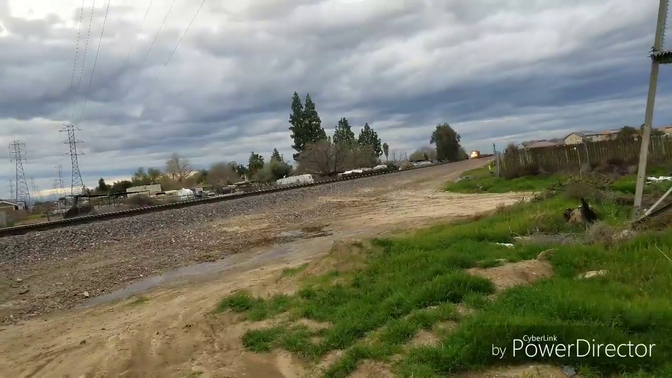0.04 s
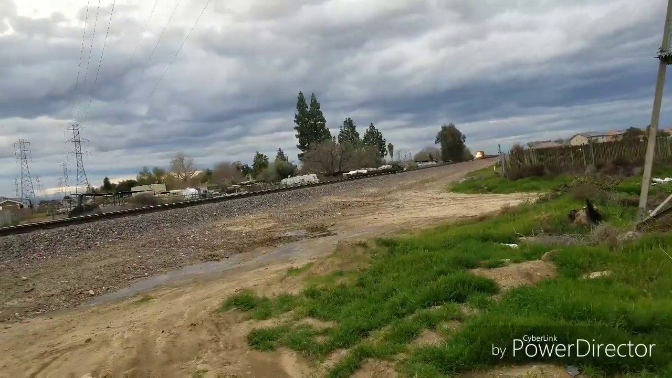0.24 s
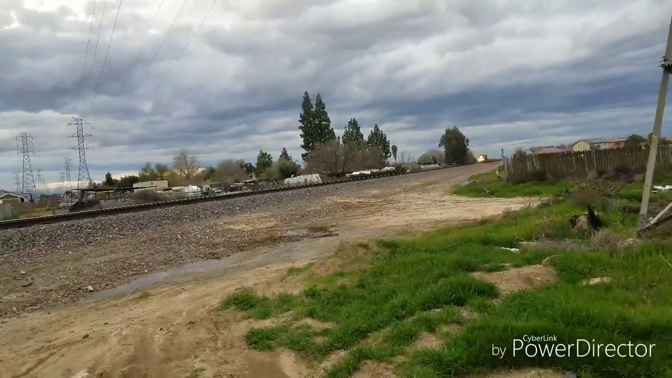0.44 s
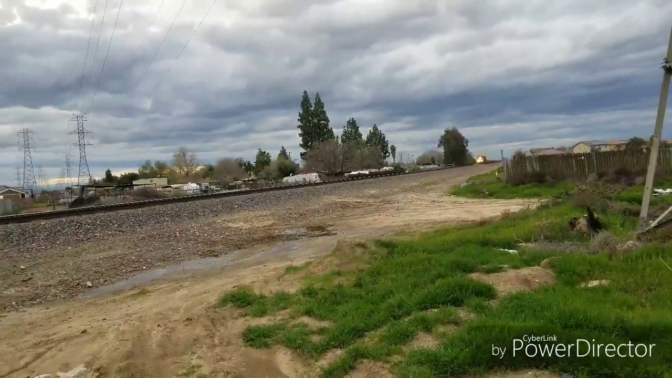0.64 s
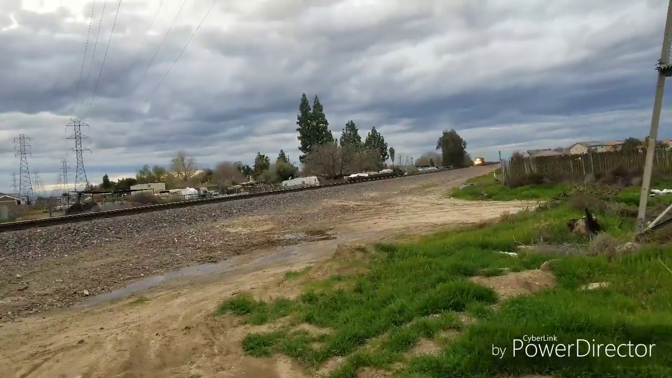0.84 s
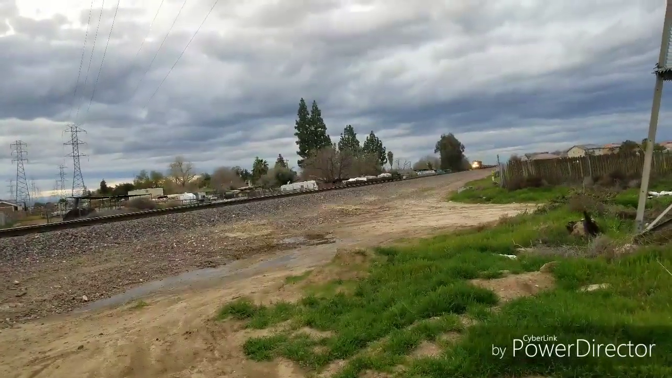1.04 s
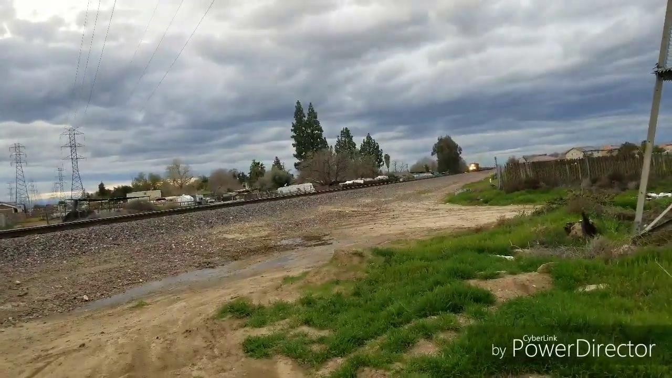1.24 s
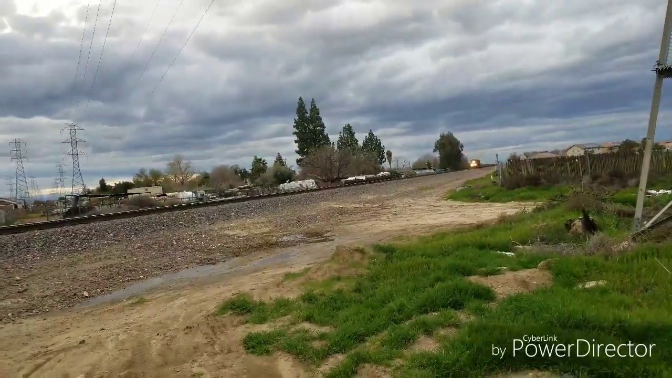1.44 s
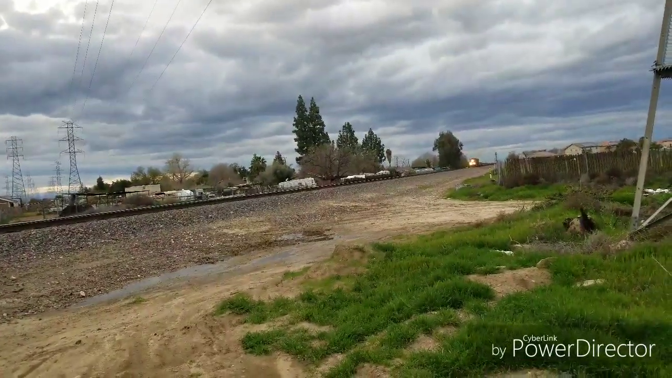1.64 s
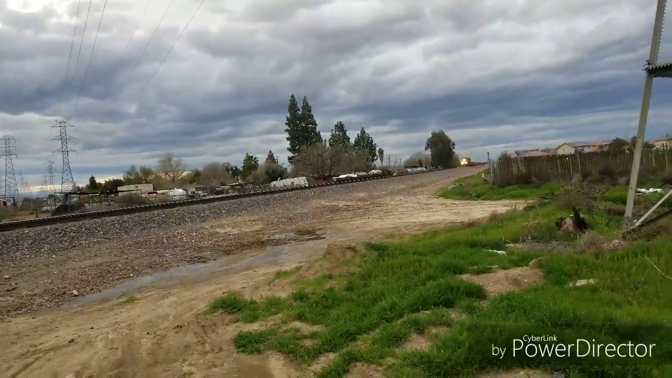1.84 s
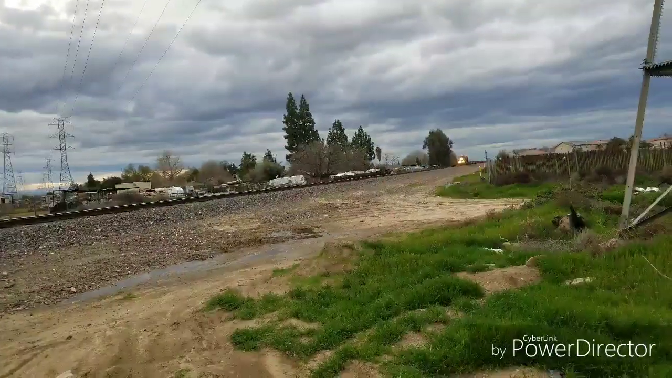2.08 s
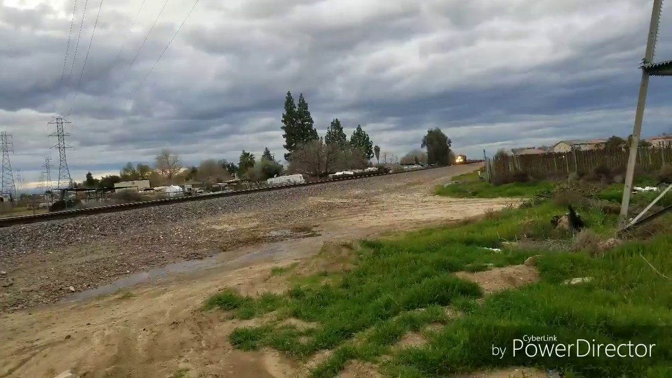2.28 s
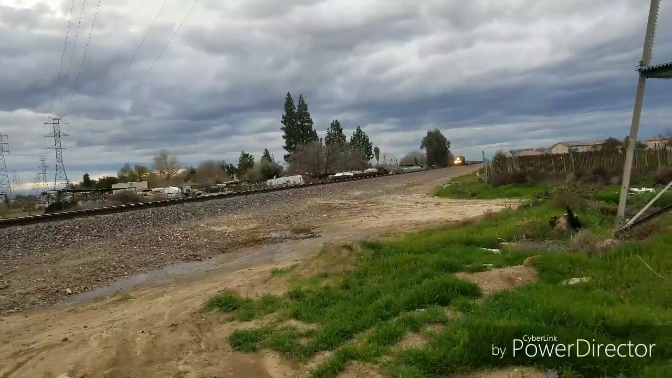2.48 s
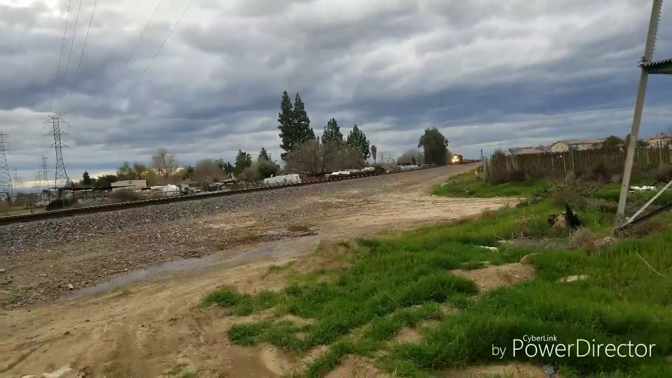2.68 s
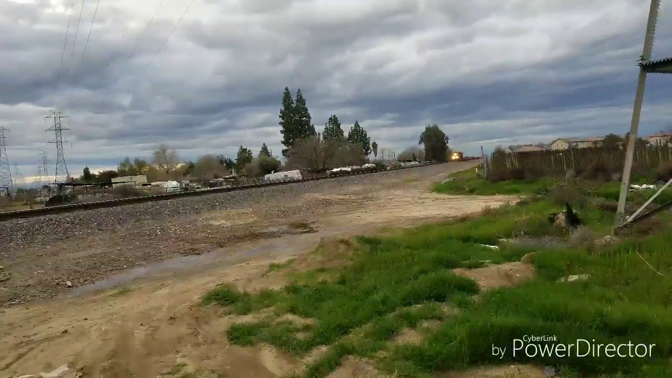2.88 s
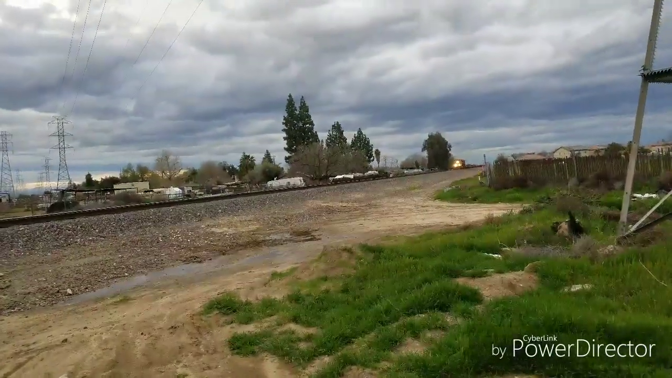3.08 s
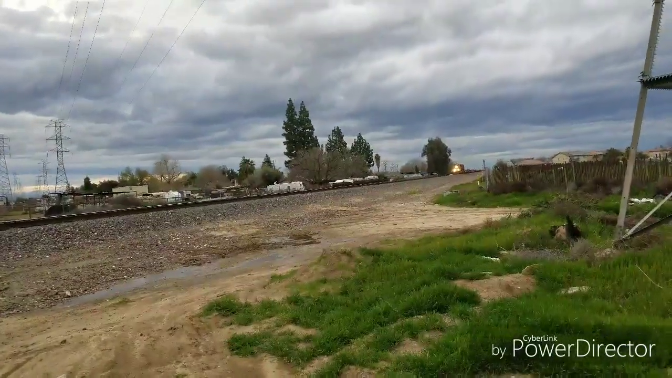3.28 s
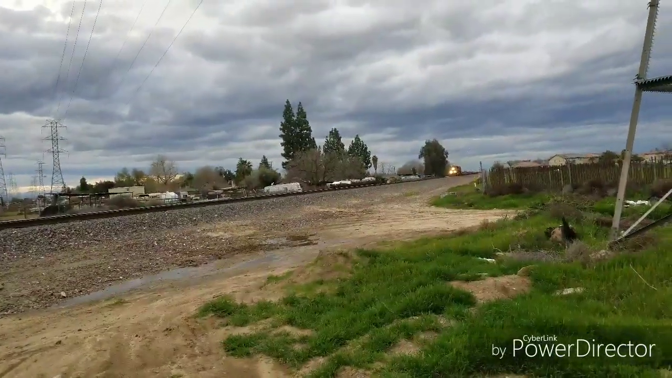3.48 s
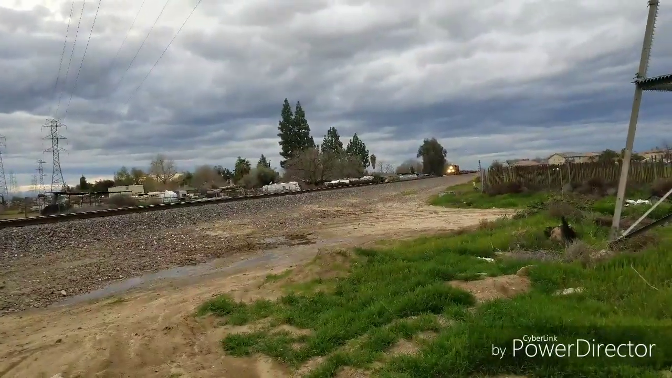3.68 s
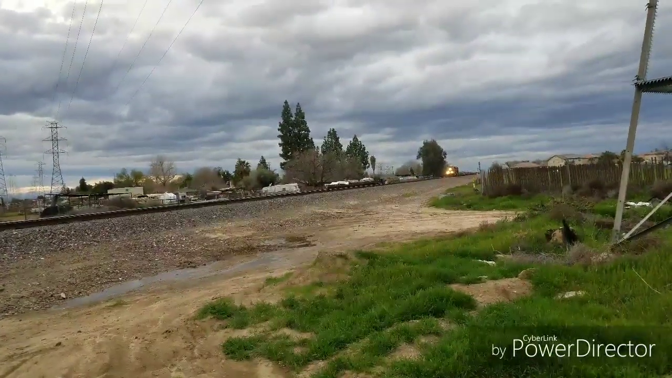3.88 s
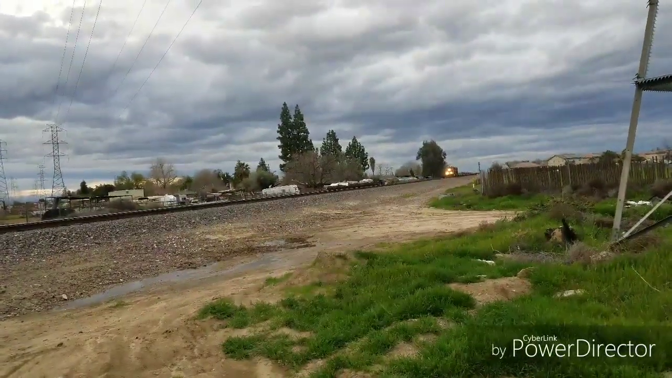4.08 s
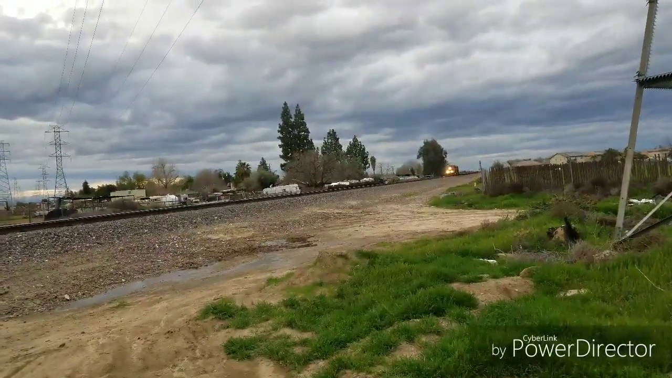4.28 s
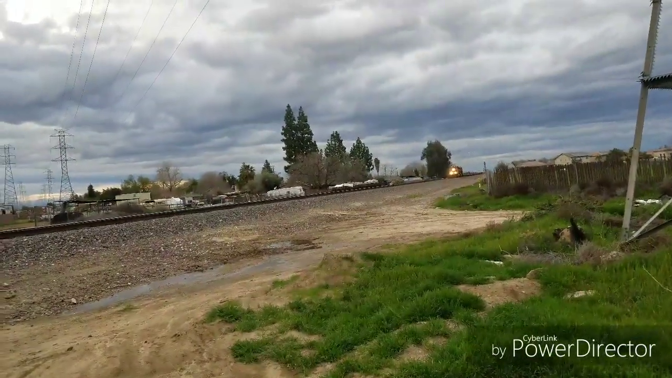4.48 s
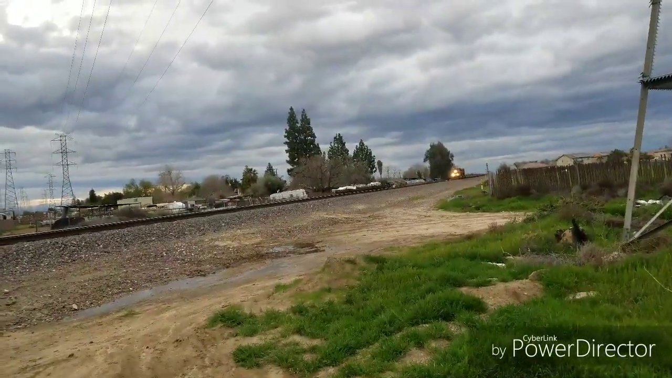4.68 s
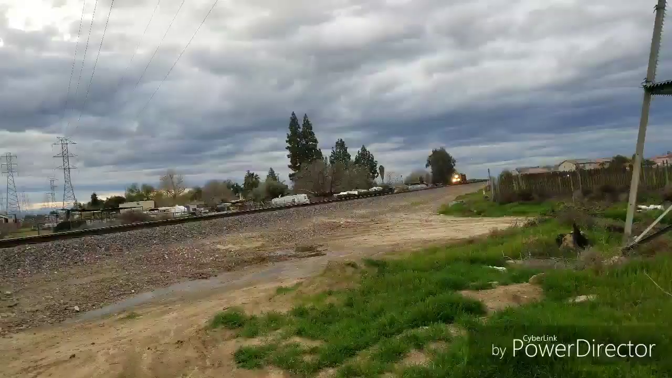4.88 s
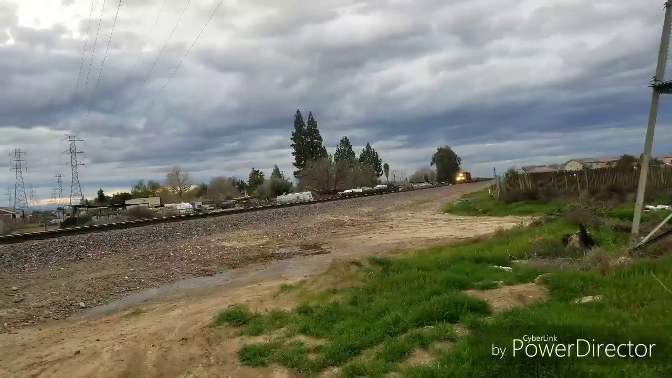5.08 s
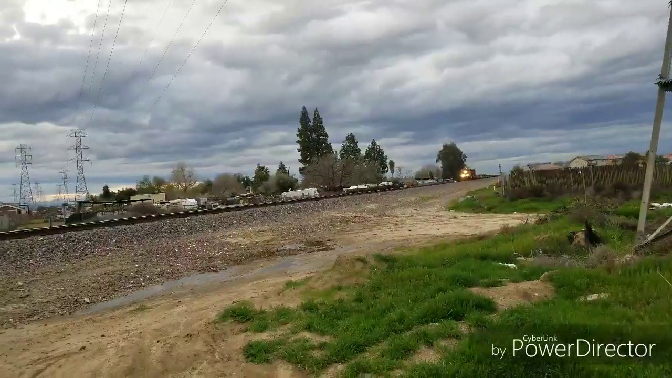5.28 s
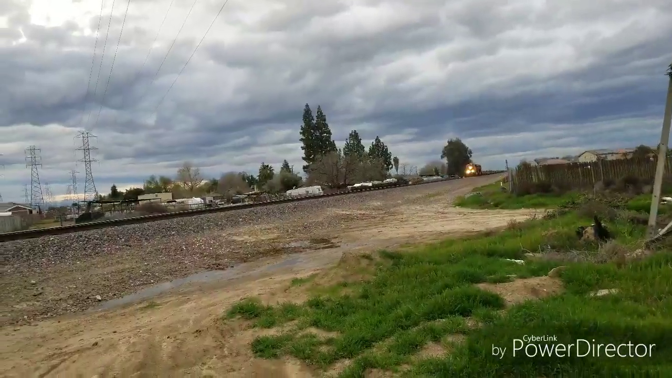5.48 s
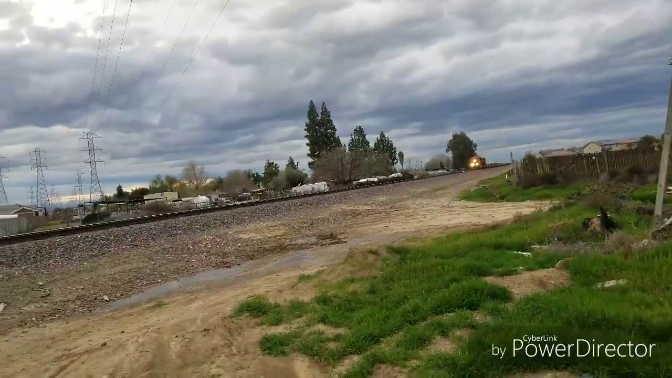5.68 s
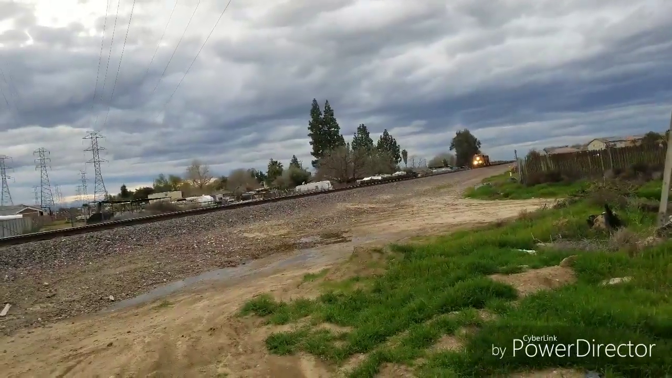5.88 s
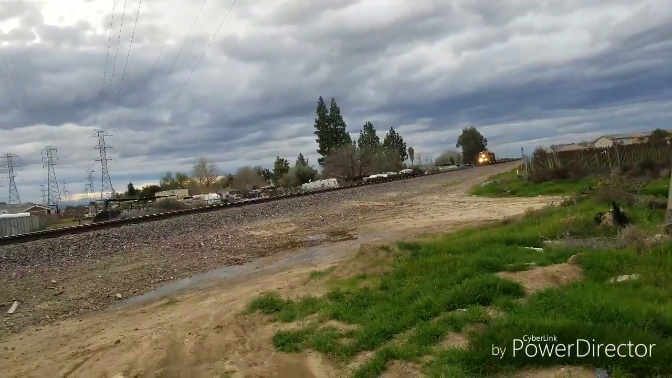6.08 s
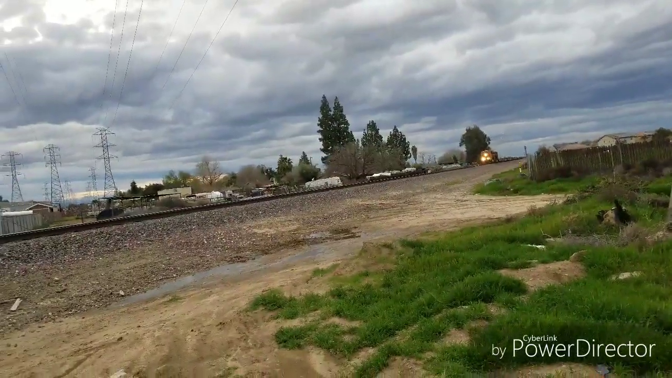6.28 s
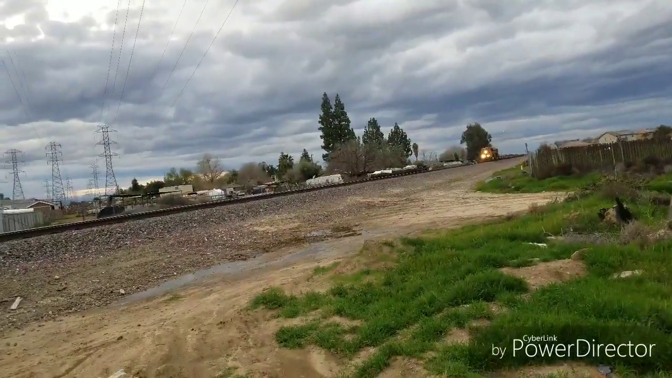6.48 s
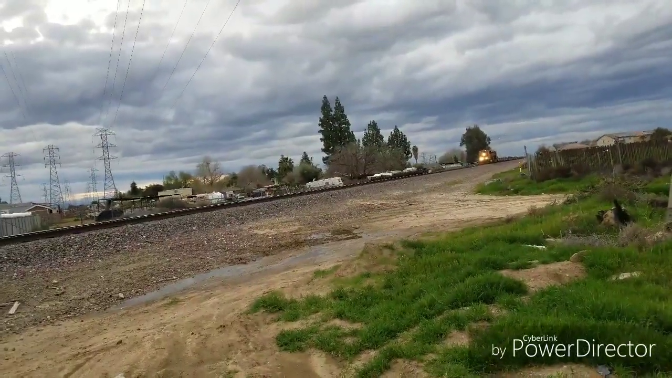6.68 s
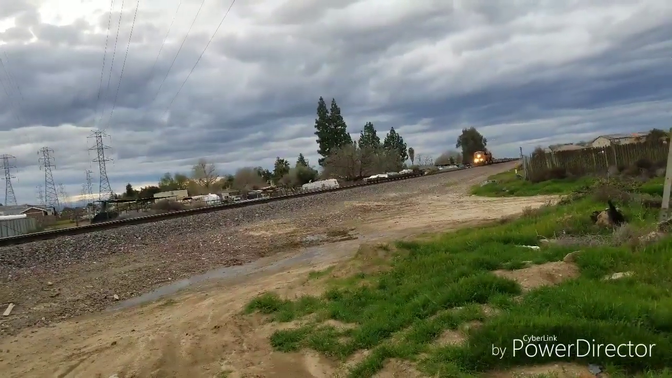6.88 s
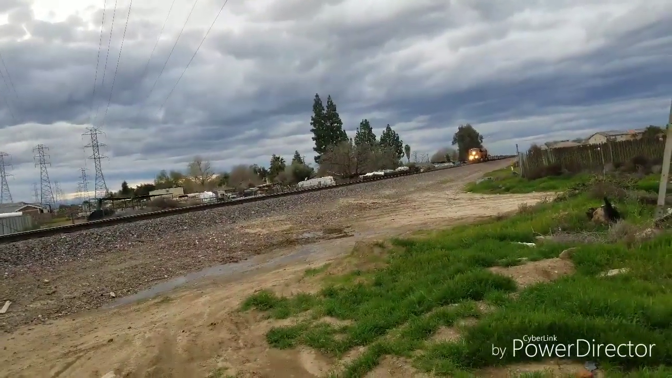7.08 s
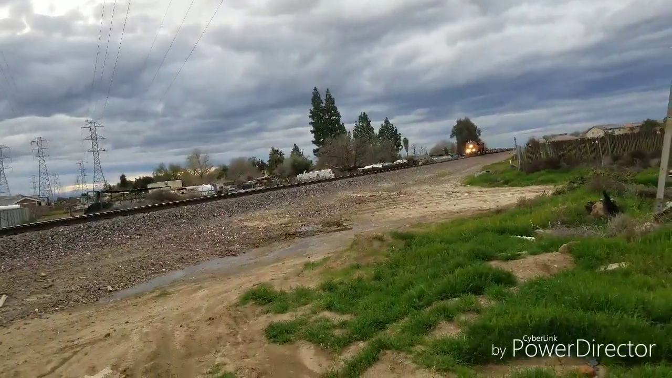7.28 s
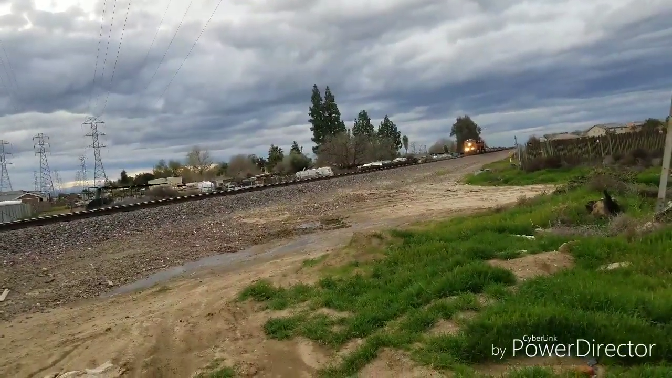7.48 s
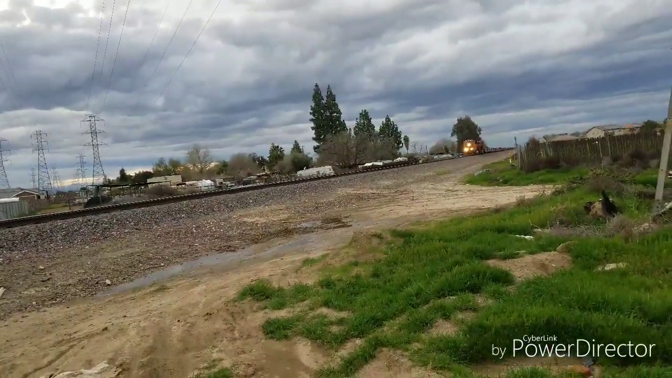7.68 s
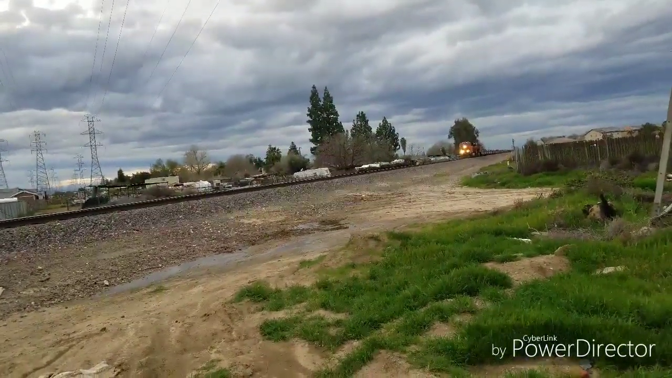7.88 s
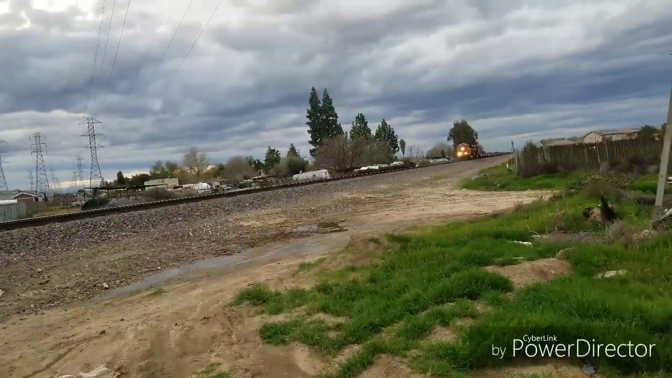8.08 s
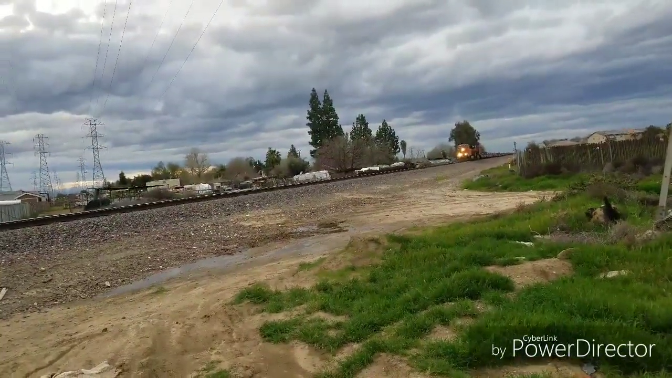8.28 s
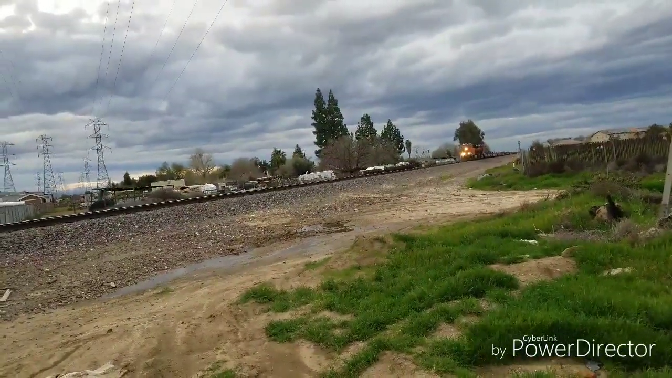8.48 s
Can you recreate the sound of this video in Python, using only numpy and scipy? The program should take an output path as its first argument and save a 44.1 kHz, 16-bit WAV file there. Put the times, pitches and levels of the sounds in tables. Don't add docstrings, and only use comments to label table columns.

```python
import sys
import numpy as np
from scipy import signal
from scipy.io import wavfile
from scipy.ndimage import uniform_filter1d

SR = 44100
rng = np.random.default_rng(int(sys.argv[2]) if len(sys.argv) > 2 else 0)


def master_out(mix):
    frames = np.transpose(np.atleast_2d(mix))
    ceiling = np.clip(frames, -1, 1)
    pcm = np.round(ceiling * 32767).astype(np.int16)
    wavfile.write(sys.argv[1], SR, pcm)


def elevation(decibels):
    levels = np.asarray(decibels, float)
    return 10 ** (levels / 20)


N = 376613
T = np.arange(N) / SR

# (time [s], nearness [0 far - 1 near])
APPROACH = [(0, -0.15), (1, -0.037), (2, 0.095), (3, 0.3), (4, 0.42), (5, 0.57), (6, 0.66), (7, 0.87),
            (7.6, 1.004), (8.54, 1.07)]
# (multiple of the engine cycle [1], far level [dB], near level [dB])
ENGINE_ORDERS = [(5, -60, -52), (6, -41.5, -41), (7, -51, -51), (8, -61, -55), (9, -36.5, -29.5),
                 (10, -47, -41), (11, -43, -36), (12, -41, -34), (13, -54, -46), (14, -54, -36),
                 (15, -43.5, -26), (16, -47, -34.5), (17, -49.5, -41), (18, -42, -35), (19, -48, -44),
                 (20, -52, -45), (21, -44, -37), (22, -47, -39), (23, -62, -50), (24, -54, -44),
                 (25, -46.5, -40), (26, -50, -42), (27, -51, -42.5), (28, -48.5, -39), (29, -56, -49),
                 (30, -52, -44), (31, -57, -51), (32, -65, -56), (33, -59, -50), (34, -67, -52),
                 (35, -67, -58), (37, -70, -56), (43, -80, -63)]
# (frequency [Hz], level [dB])
RUMBLE_SPECTRUM = [(20, -15.5), (40, -10.5), (62, 6.5), (75, 0.5), (100, 0.5), (200, 0), (300, -7),
                   (325, -14), (350, -10.5), (400, -20.5), (800, -41), (1500, -88.5)]
# (time [s], frequency [Hz])
BLADE_RATE = [(0, 536.5), (8.54, 541.8)]
# (multiple of the blade rate [1], far level [dB], near level [dB])
BLOWER_HARMONICS = [(2, -61, -58), (3, -67, -57.5), (4, -67, -65)]
# (frequency [Hz], level [dB])
HUM_SPECTRUM = [(250, -9.5), (420, -14.5), (528, -15), (575, -9.5), (880, -6.5), (1030, 0.5), (1130, -10),
                (1310, -16), (1550, -9), (1690, -13), (2200, -18.5), (2260, -19), (3200, -32.5),
                (4160, -25.5), (7040, -120)]
# (time [s], level [dB])
HUM_LEVEL = [(0, -52), (.6, -50.5), (3.5, -51.5), (3.9, -50), (4.3, -50.5), (7.6, -51.5), (8.0, -51.5),
             (8.54, -52)]
# (frequency [Hz], level [dB])
ROAR_SPECTRUM = [(380, -25.5), (520, 0), (650, 2), (800, 6), (920, -8.5), (1100, -28)]
# (frequency [Hz], level [dB])
GRASS_SPECTRUM = [(8800, -42), (9800, -5), (10500, -3), (14000, 1), (15500, -5)]
# (frequency [Hz], level [dB])
HISS_SPECTRUM = [(1530, -23.5), (2600, -2.5), (3250, -7), (4150, -2), (4720, -2), (5160, -2), (5800, -1.5),
                 (6600, -20), (8580, -46), (14500, -120)]
# (time [s], level [dB])
HISS_LEVEL = [(0, -63), (.2, -67.5), (.5, -60.5), (.85, -63), (2.2, -62.5), (4.5, -62.5), (6.6, -57),
              (7.1, -53.5), (8.54, -53)]
# (frequency [Hz], level [dB])
PUFF_TREBLE = [(5500, -24.5), (6400, 1), (7400, -10.5), (8600, -12.5), (9400, 0.5), (10500, -5.5),
               (12000, -23)]
RAIL_HZ = (8800, 9600, 10200, 10900, 11600, 12200, 12850, 13500, 14000, 14400, 14800, 15400)
RAIL_SHAPE = (-27.5, -13.5, -8, -5.5, -1.5, -3, 4, 0, 1, 0, 1, -6)
RAIL_MODES = (10950, 12054, 12138, 12678, 12754, 12803, 12935, 14057, 14404, 14478, 14754, 14905)
# (start [s], hold [s], level at the start [dB], level at the end [dB])
RAIL_BURSTS = [(0.02, .07, -64, -63), (.44, 0.035, -67, -72), (.6, 0.12, -66, -65),
               (0.966, 0.4, -63.5, -59), (1.426, 0.37, -59, -58), (2.09, 0.66, -61.5, -57.5),
               (2.9, .06, -63, -57.5), (3.478, 0.28, -56, -61), (3.734, 0.5, -56, -56),
               (4.508, 0.23, -72, -66), (4.788, 0.072, -60, -63), (5.35, 0.27, -61, -66),
               (5.64, 0.36, -55.5, -52.5), (6.17, .07, -62, -63), (6.405, 0.17, -54.5, -60),
               (6.832, 0.24, -52.5, -53), (7.107, 0.21, -52, -49.5), (7.494, 0.026, -51, -58),
               (7.62, 0.11, -54, -55.5), (8.088, 0.11, -53.5, -54), (8.313, .25, -53.5, -48.5)]
# (time [s], peak level [dB], ring frequency [Hz], relative snap level [dB], left-right [dB])
TICKS = [(0.4892, -51, 3000, 0, -4), (0.5982, -43, 5000, 7, -8), (0.605, -43, 5500, -1, 0.),
         (0.6395, -50, 5000, 5, -6), (0.7268, -46, 5200, 6, 0.), (0.7278, -44, 5330, 0., 6),
         (2.037, -50, 5070, 6, 3), (2.0542, -50, 5500, -3, -6), (3.273, -50, 4400, 4, 1),
         (3.5805, -52, 3100, 2, -3), (3.709, -50, 5430, -1, 4), (3.558, -52, 5000, 2, 0.),
         (4.655, -59, 2970, 13, -5), (4.7194, -57, 3880, 6, -1), (4.849, -52, 5500, 4, -3),
         (4.8953, -43, 4900, -10, -2.5), (5.3636, -46, 4940, -5, -1.5), (5.3894, -51, 5770, 1, 6),
         (5.651, -45, 5090, 3, 1), (6.2446, -47, 5180, -1, -3), (6.9494, -50, 5680, 7, -2),
         (7.655, -50.5, 5200, 6, -1), (8.358, -55, 5200, 5, -2)]
# (time [s], peak level [dB], ring frequency [Hz], relative snap level [dB], left-right [dB])
POPS = [(0.572, -43, 4380, -15, -2), (.6062, -40, 5000, -25, 0.), (.651, -47, 5300, -20, -1),
        (0.79, -51, 5560, -20, -2), (1.114, -48, 5600, -15, -1), (1.245, -46, 4000, -15, -6),
        (2.6979, -38.5, 4240, -28, -14), (4.909, -42, 4720, -19, -8), (4.97, -40, 4900, -7, -6),
        (5.3135, -35.5, 3200, -14, -9), (5.5583, -44.5, 4000, -18, -18), (5.5971, -44, 5340, -10, -4),
        (5.612, -43, 4740, -14, -3.5), (6.2007, -45, 3390, -18, -8), (7.718, -38, 4200, -24, -5),
        (7.8056, -38, 3970, -23, -10)]
# (start [s], length [s], frequency [Hz], glide [Hz/s], level [dB])
SECOND_BLOWER_WHINES = [(.55, .3, 1050, 0, -55), (1.6, .3, 1045, 0, -52), (1.98, .25, 1044, 0, -55),
                        (3.77, .17, 1042, 0, -44.5), (3.9, .3, 1038, -7, -43.5), (4.18, .16, 1028, 0, -52),
                        (4.36, .5, 1050, -32, -47.5), (4.68, .34, 1041, -45, -47), (4.96, .55, 1011, -38, -50.5),
                        (5.46, .16, 925, 0, -52), (5.92, .26, 969, 0, -52), (6.1, .4, 1007, 4, -46.5),
                        (6.42, .5, 1008, 2, -46.5), (6.78, .5, 1006, 0, -49), (6.95, .45, 977, 10, -50),
                        (7.28, .42, 976, 4, -48.5), (3.68, .34, 1565, -14, -48.5), (3.48, .26, 1568, 0, -58),
                        (3.94, .35, 1555, -70, -57), (6.8, .5, 1514, -10, -57), (8.05, .7, 1078, 0, -55)]
# (time [s], frequency [Hz], decay [s], level [dB])
CASING_HITS = [(3.325, 11000, .001, -51), (3.531, 11500, .001, -47), (3.709, 9300, 0.0013, -44),
               (.666, 11000, .001, -50), (.68, 10900, .0015, -47), (.691, 10500, .0008, -50),
               (.7205, 10500, .001, -50), (.744, 11200, .001, -50), (.5978, 11200, .0008, -34),
               (.605, 10950, .009, -46), (.617, 10950, .003, -45), (.6395, 11000, .003, -46),
               (2.0368, 10000, .0018, -35), (2.0542, 10900, .0015, -41), (4.849, 11000, .002, -39),
               (4.856, 9500, .0015, -42), (4.856, 11500, .0015, -46), (4.998, 11000, .001, -52)]
# (start [s], length [s], first frequency [Hz], last frequency [Hz], level [dB])
BIRD_NOTES = [
    (1.147, .012, 4650, 5950, -51),
    (1.138, .014, 4500, 6000, -60),
    (1.875, .035, 3100, 2700, -59),
    (5.24, .055, 4650, 5050, -58),
    (5.285, .07, 5000, 5350, -61),
    (5.9, .03, 5750, 5600, -55),
]
# (frequency [Hz], level [dB])
MICROPHONE_FLOOR = [(5000, -19.5), (6200, -3.5), (7300, -12), (8500, -12.5), (9200, -2), (10000, -2.5),
                    (11800, -9), (15500, -6.5)]
# (frequency [Hz], threshold [dB])
LOST_BINS = [(2600, -12), (3100, -2), (3700, -12), (5800, -20), (6400, 0), (7800, -1.5), (8900, 0),
             (10000, -2), (11500, -5), (13000, -20), (13600, -4), (14200, -20)]


def evened(x):
    return x / np.sqrt(np.mean(x ** 2) + 1e-20)


def read(points, hz):
    f, value = np.transpose(points)
    return np.interp(np.log(hz + 1), np.log(f + 1), value)


def column(rows, t, order=1):
    rows = np.array(rows)
    return np.interp(t, rows[:, 0], rows[:, order])


def between(far_db, near_db):
    return far_db + (near_db - far_db) * column(APPROACH, T)


def drift(rate_hz):
    t, f = T[::128], np.geomspace(.1, rate_hz, 16)
    sines = np.sin(2 * np.pi * (t[:, None] * f + rng.random(16)))
    slow = (sines / f ** 0.29).sum(1)
    return np.interp(T, t, evened(slow))


def ports(x, pan_db):
    return x * elevation(np.array([[pan_db / 2], [-pan_db / 2]]))


def noise(spectrum, same, lag=0., turn=0., size=1024, patch_db=4.0, patch_hz=304.8, patch_s=0.065, tilt=None):
    hop, hz = size // 4, np.fft.rfftfreq(size, 1 / SR)
    a, b, c, d, patch = rng.standard_normal((N // hop + 5, len(hz), 5)).T
    patch = uniform_filter1d(patch, 1 + int(patch_hz * size / SR), 0)
    patch = evened(uniform_filter1d(patch, 1 + int(patch_s * SR / hop), 1))
    same = np.clip(read(same, hz), 0, 1)[:, None]
    left, other = a + 1j * b, c + 1j * d
    late = np.exp(-2j * np.pi * hz * lag / SR - 1j * turn)[:, None]
    right = same * late * left + np.sqrt(1 - same ** 2) * other
    z = np.array([left, right]) * elevation(read(spectrum, hz))[:, None]
    steady = signal.istft(z[0], nperseg=size, noverlap=size - hop)[1]
    level = np.sqrt(np.mean(steady ** 2))
    shape_db = patch_db * patch
    if tilt:
        edge_hz, sign, lift_db = tilt
        share = 1 / (1 + np.exp(np.clip(sign * (edge_hz - hz) / 120, -50, 50)))
        t = np.arange(z.shape[2]) * hop / SR
        shape_db = shape_db + share[:, None] * np.interp(t, T, lift_db)
    return signal.istft(z * elevation(shape_db), nperseg=size, noverlap=size - hop)[1][:, :N] / level


def engine():
    cycle_hz, start_cycles = 8.784, .15949
    hunt = .005 * np.cos(2 * np.pi * (T - 2.3) / 6.)
    cycle = 2 * np.pi * (cycle_hz * T + start_cycles + hunt) + .012 * drift(.6)
    out = 0
    for k, far_db, near_db in ENGINE_ORDERS:
        smear = .464382 * k ** 2 + .0010985 * k ** 3 + .268 * (k % 3 == 0) + .168
        phase = k * cycle + 2 * np.pi * smear
        level = elevation(between(far_db, near_db) + .7 * drift(4))
        out = out + level * np.cos(phase + .07 * drift(3))
    return ports(np.sqrt(2) * out, 1.6)


def rumble():
    low = noise(RUMBLE_SPECTRUM, [(50, 0.94), (400, 0.97)], size=4096, patch_db=1.8, patch_hz=12., patch_s=.3)
    return low * elevation(between(-39.5, -33)) * ports(1, 1.8)


def tone_ports(x):
    return np.sqrt(2) * np.array([x, .9 * np.roll(x, 6)])


def blowers():
    blade = 2 * np.pi * np.cumsum(column(BLADE_RATE, T) + .35 * drift(5)) / SR
    out = 0
    for k, far_db, near_db in BLOWER_HARMONICS:
        out = out + elevation(between(far_db, near_db) + 2 * drift(15)) * np.cos(k * blade)
    turbo = 2 * np.pi * np.cumsum(4113 + 5 * drift(30)) / SR
    out = out + elevation(between(-90, -69) + 3 * drift(11)) * np.cos(turbo)
    return tone_ports(out)


def hum():
    upper_db = between(-2.14, 4)
    far = noise(HUM_SPECTRUM, [(400, 0.43), (900, 0.95), (1500, 0.41), (2500, 0.82)], lag=2.45,
                patch_db=1.3, tilt=(1300, 1, upper_db))
    return far * elevation(column(HUM_LEVEL, T) + 6) * ports(0.93, 0.76)


def wagons():
    roar = noise(ROAR_SPECTRUM, [(500, .85), (900, .9)], lag=2.6, patch_db=0.5)
    rustle = noise(GRASS_SPECTRUM, [(10000, .4), (15000, .4)], size=512, patch_db=-0.5)
    return roar * elevation(between(-63, -51.5)) + rustle * elevation(between(-78.5, -62))


def puffs(offset_s, width_s):
    first_s, period_s, quicken_s = .621, .7193, .0016
    turn = np.arange(12)
    at = first_s + offset_s + period_s * turn - quicken_s * turn ** 2
    nearest = at[np.searchsorted((at[1:] + at[:-1]) / 2, T)]
    return np.exp(-((T - nearest) / width_s) ** 2) * elevation(2 * between(0, 1))


def hiss():
    air = noise(HISS_SPECTRUM, [(2500, 0.08), (6000, 0.13)], lag=9.1, size=512,
                patch_db=1.6, patch_hz=700., patch_s=.03)
    treble = noise(PUFF_TREBLE, [(6000, 0.48), (10000, .3)], size=512)
    sharp, soft = puffs(0, 0.067), puffs(0.36, 0.095)
    power = elevation(2 * column(HISS_LEVEL, T)) + elevation(2 * -59) * sharp + elevation(2 * -59.5) * soft
    body = air * np.sqrt(power) * elevation(4.5) * ports(0.72, -2.3)
    return body + ports(treble, 0.0) * np.sqrt(sharp) * elevation(-66)


def bursts():
    rise_s, fall_db_per_s = 0.045, 106.5
    power = np.zeros(N)
    for s, hold, from_db, to_db in RAIL_BURSTS:
        db = np.interp(T, (s, s + hold, s + hold + 1), (from_db, to_db, to_db - fall_db_per_s))
        rise = np.clip((T - s) / rise_s + .5, 0, 1)
        power += (rise * elevation(db)) ** 2
    return power


def rail():
    lag, turn = 23., 2.85
    burst = bursts()
    upper = burst + elevation(2 * between(-78, -69))
    lower = burst * elevation(2 * between(-12, -7)) + elevation(2 * between(-82.5, -72.5))
    lower_lift_db = 10 + 10 * np.log10(lower / upper)
    song = noise(list(zip(RAIL_HZ, RAIL_SHAPE)), [(9000, .5), (12000, .78)], lag=lag, turn=turn,
                 patch_db=4.5, patch_hz=30., patch_s=0.15, tilt=(11700, -1, lower_lift_db))
    for hz in RAIL_MODES:
        behind = np.array([[0], [2 * np.pi * hz * lag / SR + turn]])
        level = elevation(-25. + 6.9 * drift(4.7))
        song = song + level * np.cos(2 * np.pi * hz * T + 3.4 * drift(8.3) - behind)
    return song * np.sqrt(upper) * elevation(1.8) * ports(1, 3.4)


def ticks():
    ring_s, snap_s, crack_s = 0.00257, 0.001, 0.00086
    t, out = np.arange(600) / SR, np.zeros((2, N + 600))
    u = np.minimum(t / ring_s, 1)
    for s, db, hz, snap_db, pan_db in POPS + TICKS:
        detune, start = rng.random(2)
        glide = 0.5 * np.clip(-snap_db / 22, .3, 1.2)
        swell = np.sin(np.pi * u ** (1.43 if snap_db < -4.5 else .6)) ** 2
        ring = swell * np.sin(2 * np.pi * np.cumsum(hz * (1 + glide * (2 * u - 1.2))) / SR)
        snap = 0
        for f, gain in ((9500, 1), (11000, 1), (13300, .45)):
            snap = snap + gain * np.sin(2 * np.pi * f * (.98 + .04 * detune) * t + 6 * start)
        crack = np.diff(rng.standard_normal(601)) * np.exp(-t / crack_s)
        snap = 0.61 * snap + 0.5 * crack
        tick = ring + 1.34 * elevation(snap_db) * snap * np.exp(-t / snap_s)
        out[:, round(s * SR):][:, :600] += ports(elevation(db) * tick, pan_db)
    return out[:, :N]


def second_blower():
    flutter, waver = elevation(2.5 * drift(20)), .5 * drift(8.1)
    out = np.zeros(N)
    for s, length, hz, glide, db in SECOND_BLOWER_WHINES:
        since = np.clip(T - s, 0, length)
        swell = abs(np.sin(np.pi * since / length)) ** 0.75
        phase = 2 * np.pi * (hz * since + glide * since ** 2 / 2)
        out += swell * flutter * elevation(db) * np.cos(phase + waver)
    return tone_ports(out)


def casing():
    t, out = np.arange(2000) / SR, np.zeros((2, N))
    for s, hz, decay, db in CASING_HITS:
        ring = np.sin(2 * np.pi * hz * t) * np.exp(-t / decay) * np.minimum(t / .0004, 1)
        out[:, round(s * SR):][:, :2000] += elevation(db) * ring
    return out


def bird():
    out = np.zeros(N)
    for s, length, from_hz, to_hz, db in BIRD_NOTES:
        u = np.clip((T - s) / length, 0, 1)
        phase = 2 * np.pi * np.cumsum(from_hz + (to_hz - from_hz) * u) / SR
        out += elevation(db) * np.sin(np.pi * u) * np.cos(phase)
    return ports(out, -4.0)


def scene():
    train = engine() + rumble() + blowers() + wagons() + hiss() + rail() + second_blower()
    return train + hum() + ticks() + casing() + bird()


def roll_off(x):
    return signal.sosfilt(signal.butter(12, 16390, fs=SR, output="sos"), x)


def record(dry):
    wet = dry + elevation(-68.5) * noise(MICROPHONE_FLOOR, [(5000, 0.15), (15000, 0.17)])
    hz, _, z = signal.stft(wet, SR, nperseg=1024, noverlap=512)
    power = (abs(z) ** 2).mean(0)
    treble = power[hz > 9000].mean(0)
    treble_lift = (treble / np.median(treble)) ** .09
    smooth = uniform_filter1d(power, size=13, axis=0)
    around = np.exp(uniform_filter1d(np.log(smooth + 1e-20), size=9, axis=1))
    threshold = around * treble_lift * elevation(2 * read(LOST_BINS, hz))[:, None]
    kept = uniform_filter1d(power, size=4, axis=0) > threshold
    kept = kept | (hz < 2000)[:, None]
    band_limit = np.where(hz < 15480, 1, elevation(-28) * (hz < 15830))
    z = z * kept * band_limit[:, None]
    mix = signal.istft(z, SR, nperseg=1024, noverlap=512)[1][:, :N]
    return roll_off(mix)


dry = scene()
out = record(dry)
master_out(out)
```